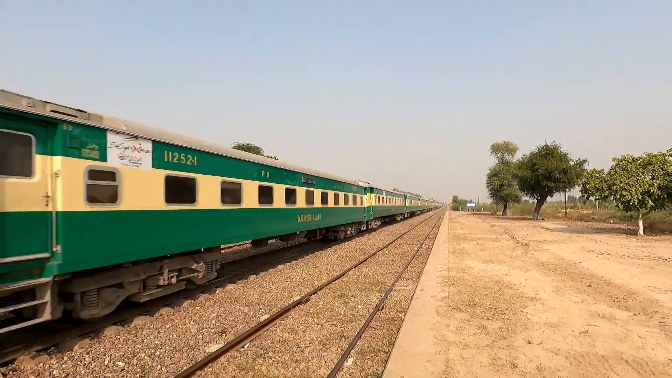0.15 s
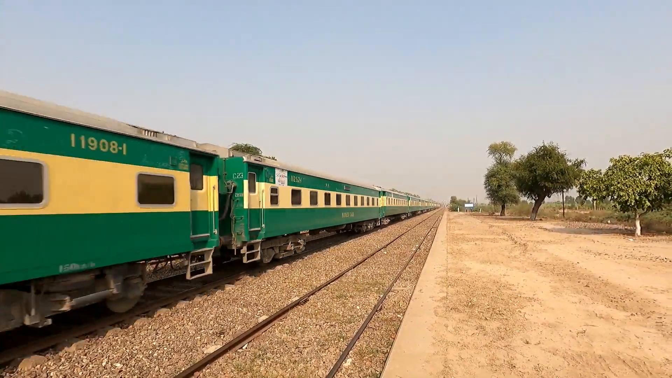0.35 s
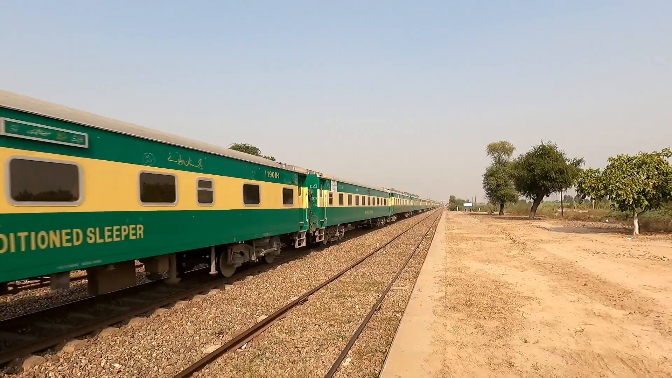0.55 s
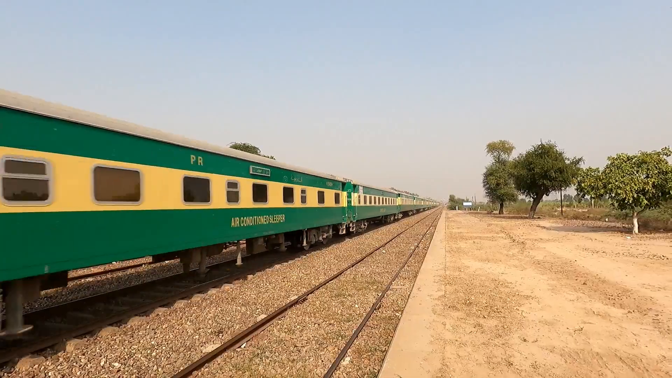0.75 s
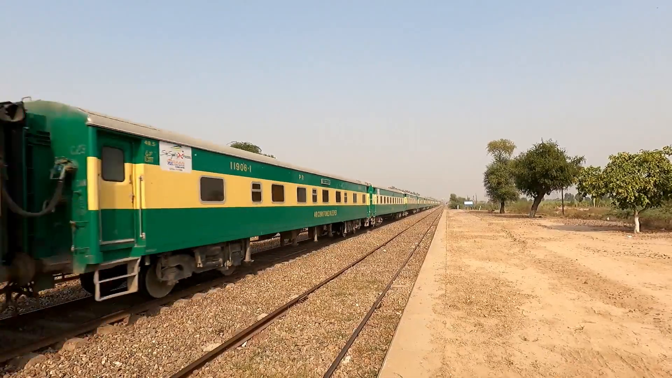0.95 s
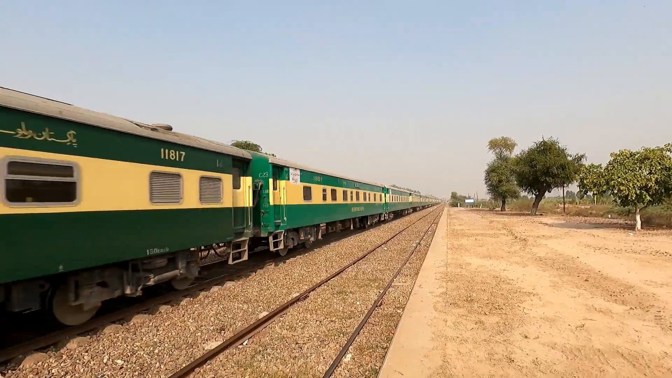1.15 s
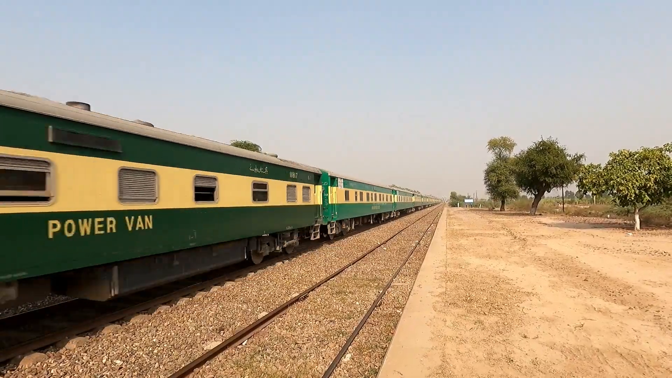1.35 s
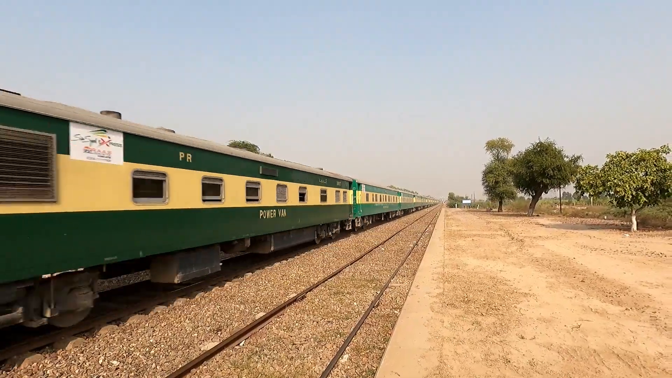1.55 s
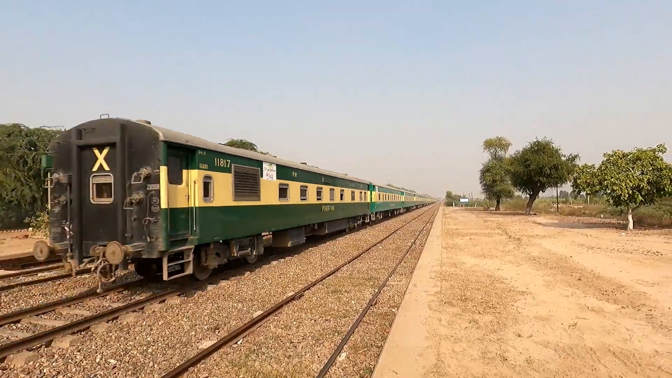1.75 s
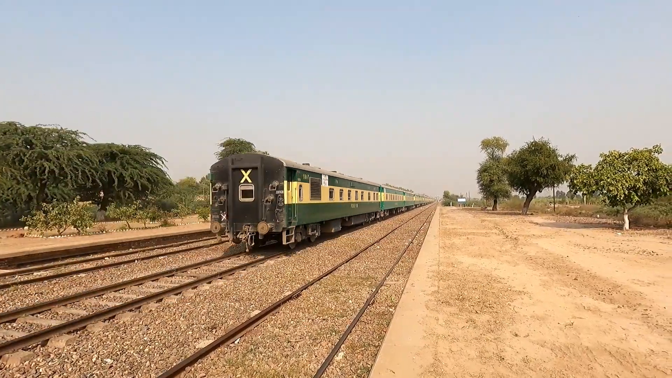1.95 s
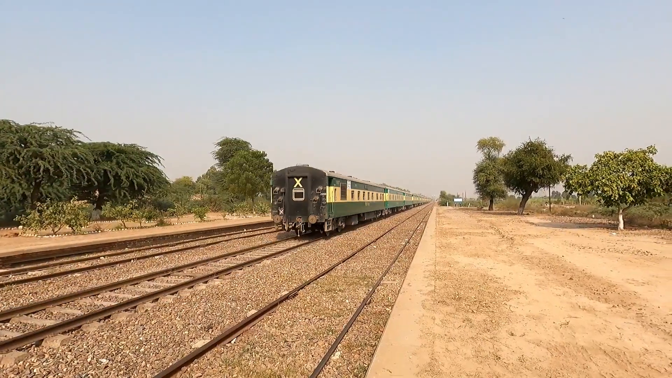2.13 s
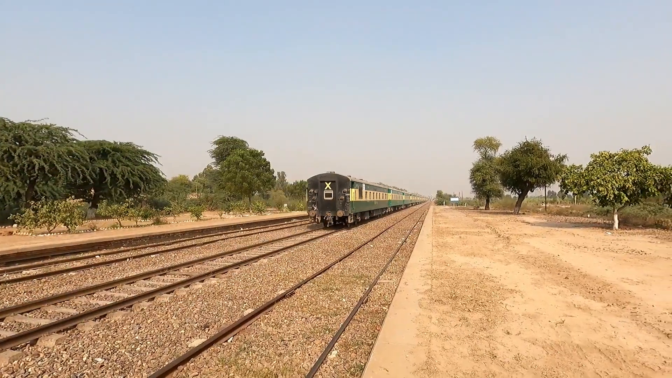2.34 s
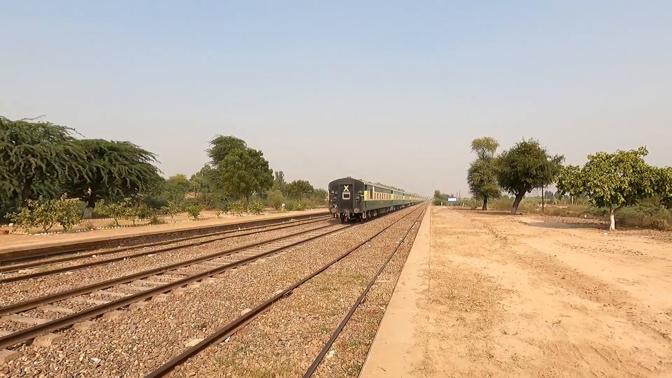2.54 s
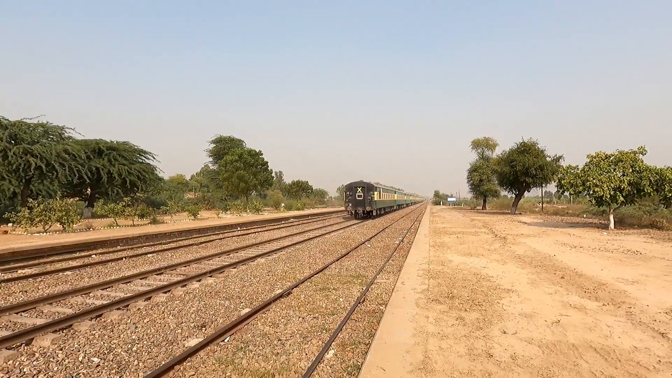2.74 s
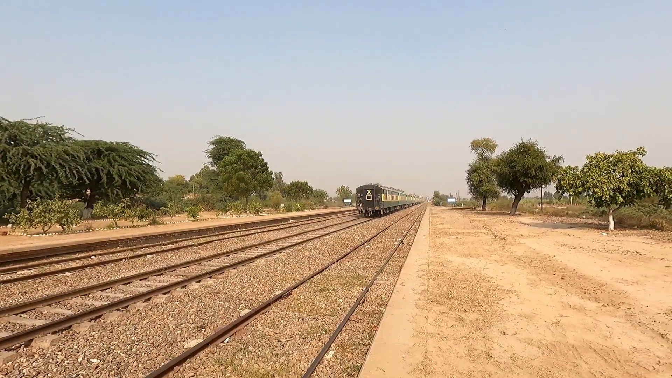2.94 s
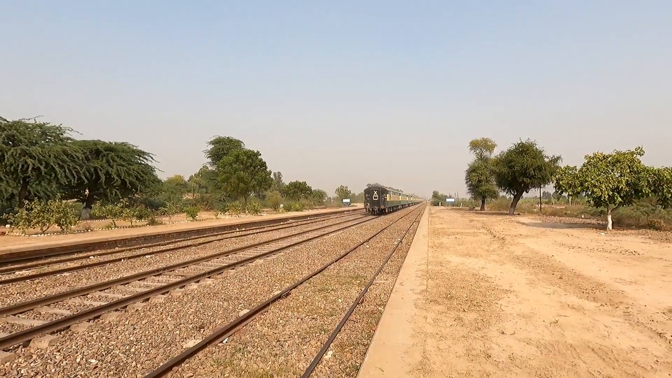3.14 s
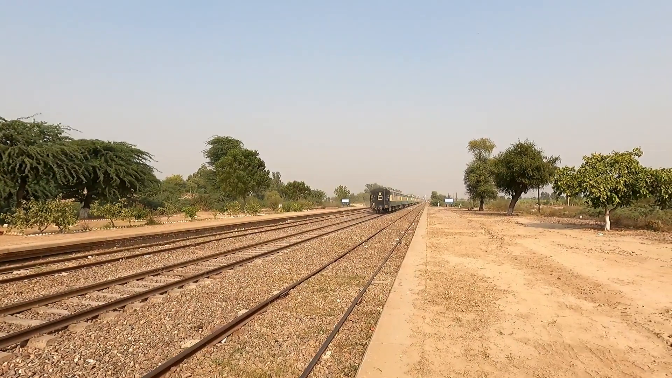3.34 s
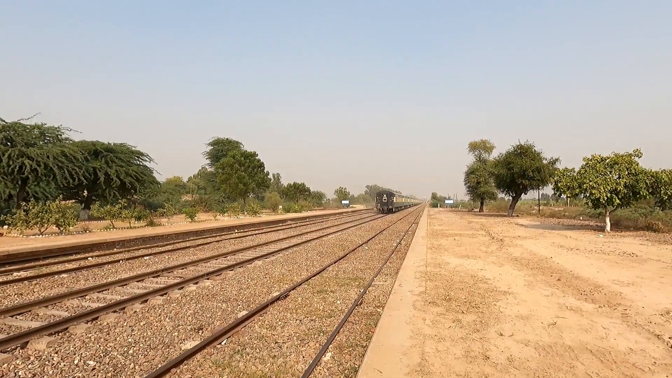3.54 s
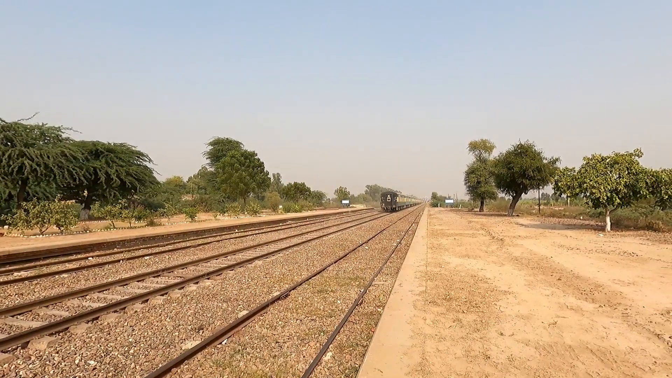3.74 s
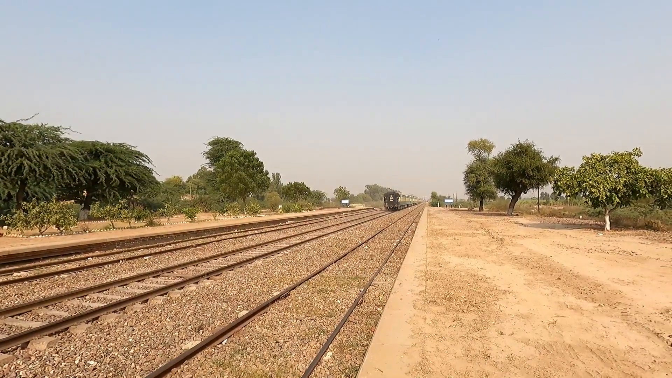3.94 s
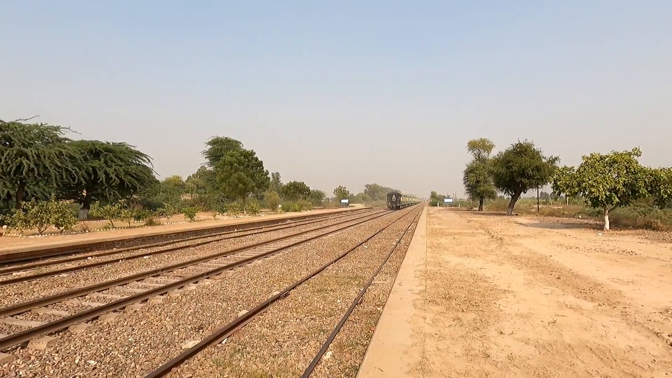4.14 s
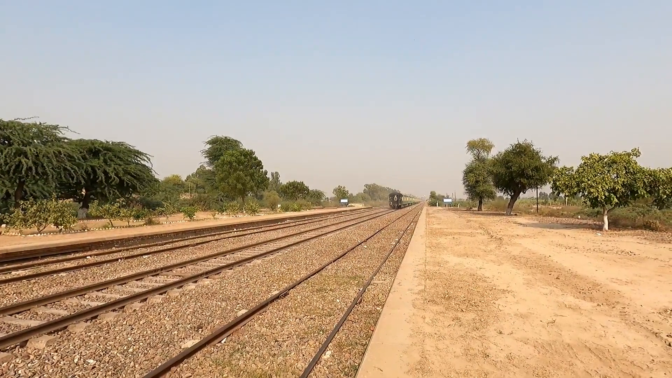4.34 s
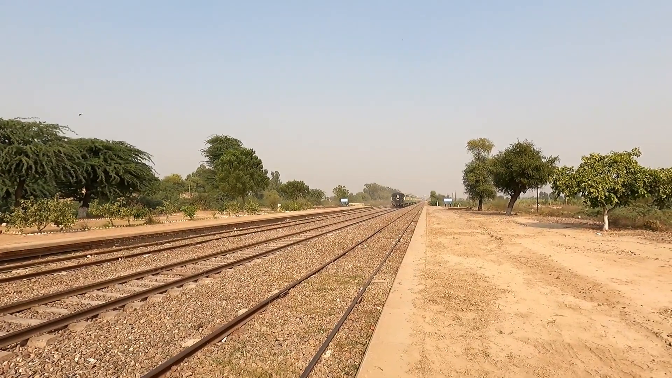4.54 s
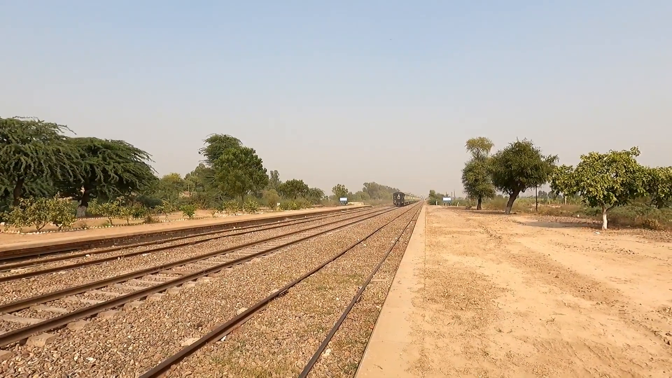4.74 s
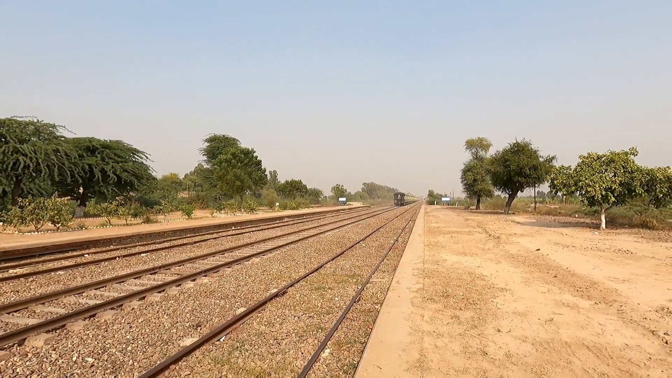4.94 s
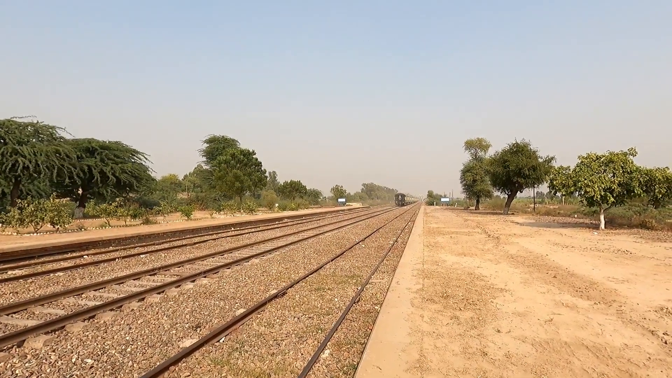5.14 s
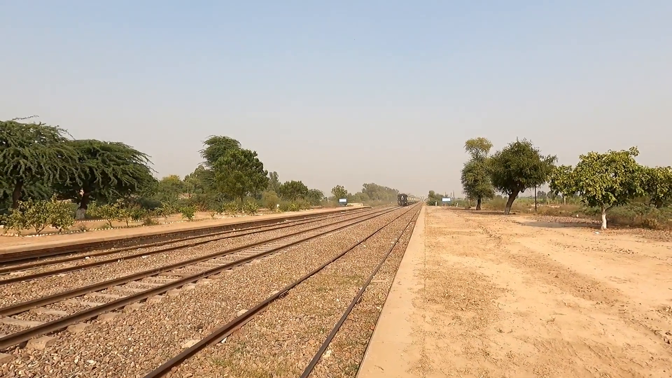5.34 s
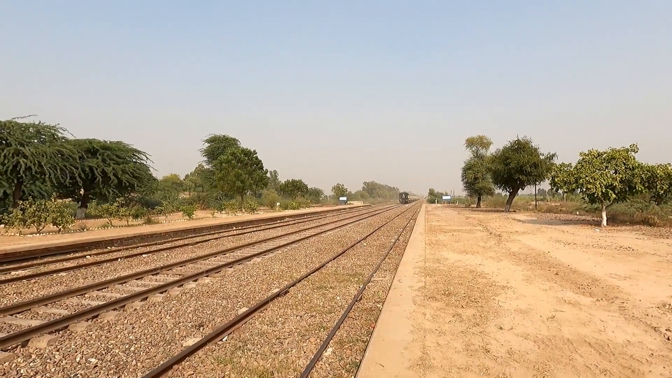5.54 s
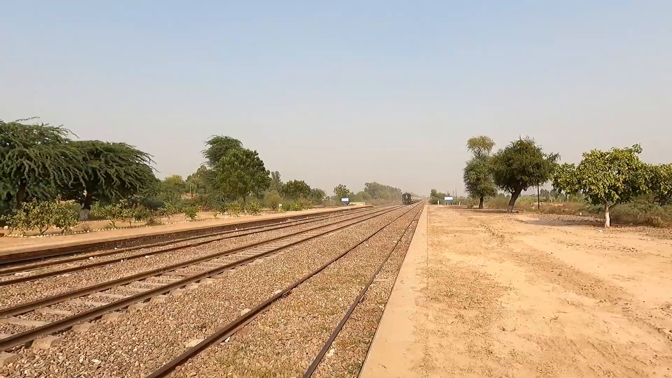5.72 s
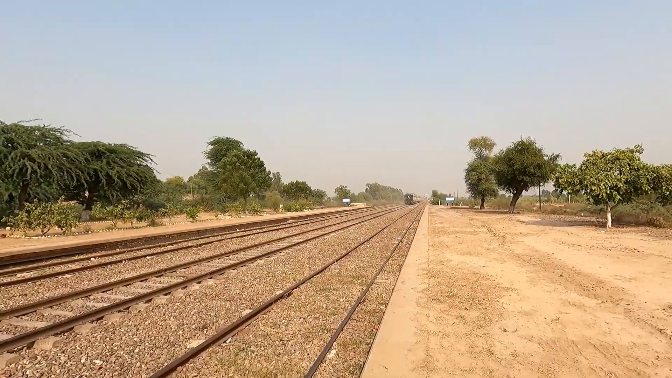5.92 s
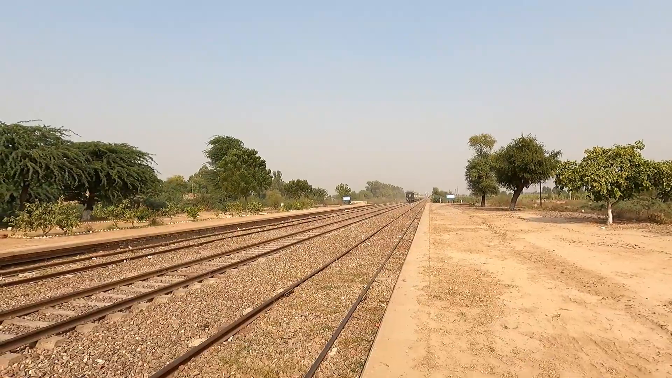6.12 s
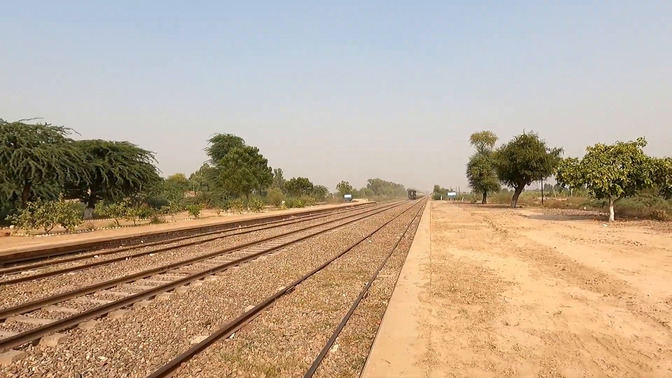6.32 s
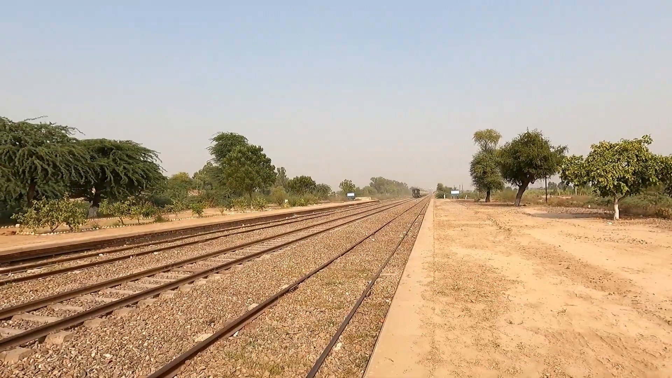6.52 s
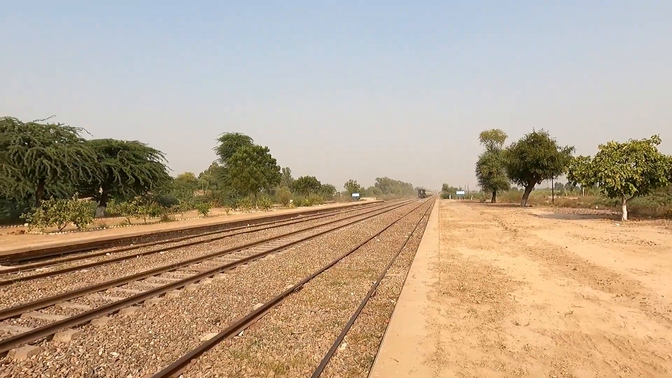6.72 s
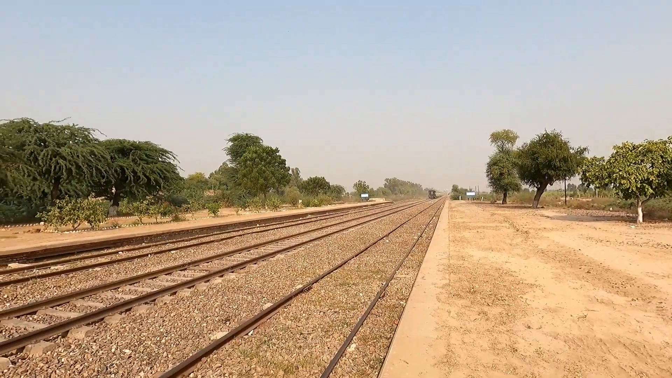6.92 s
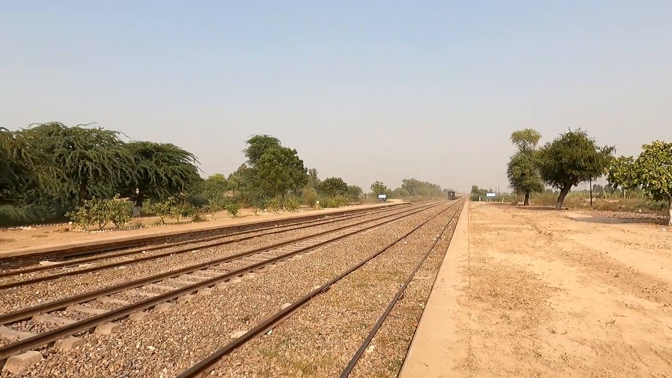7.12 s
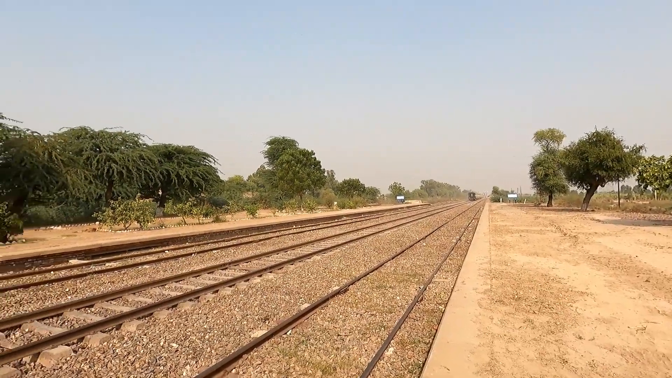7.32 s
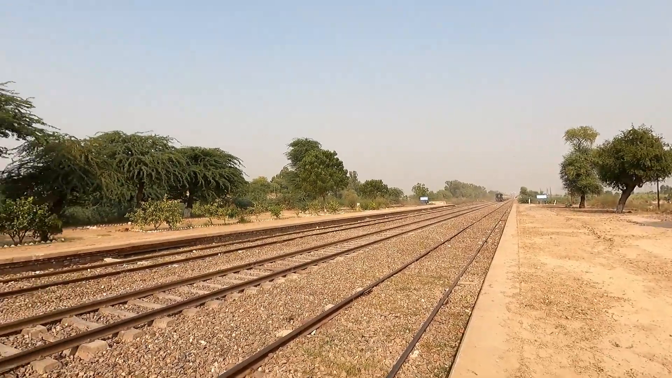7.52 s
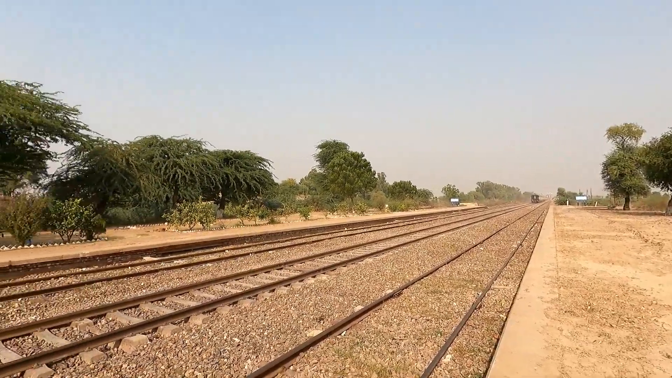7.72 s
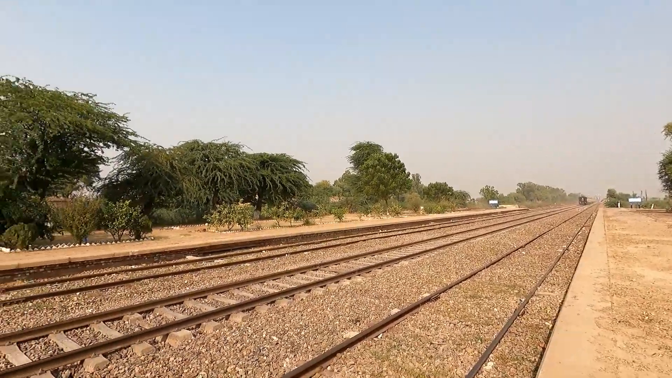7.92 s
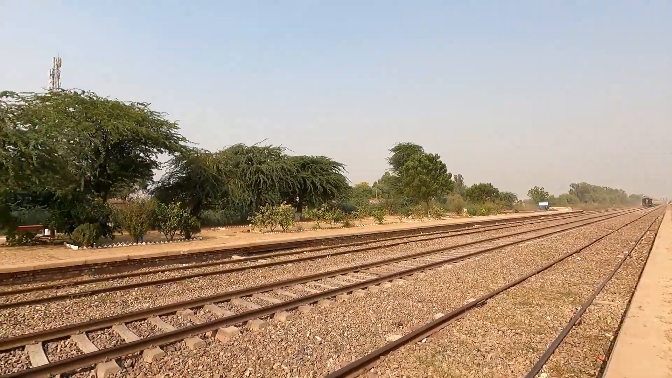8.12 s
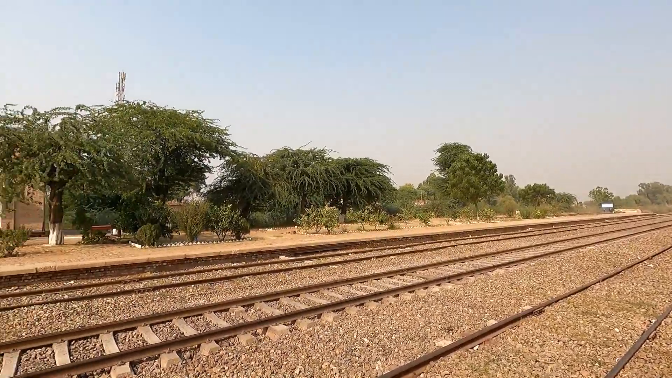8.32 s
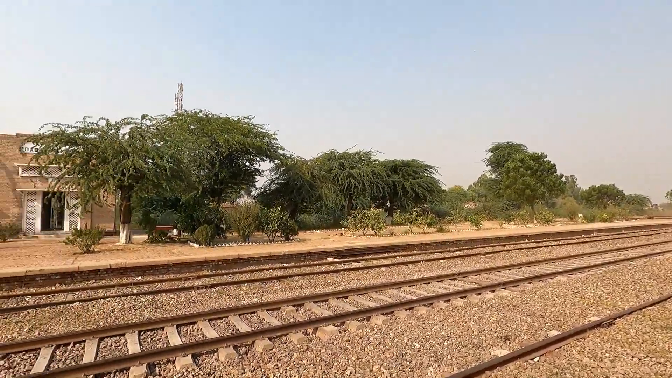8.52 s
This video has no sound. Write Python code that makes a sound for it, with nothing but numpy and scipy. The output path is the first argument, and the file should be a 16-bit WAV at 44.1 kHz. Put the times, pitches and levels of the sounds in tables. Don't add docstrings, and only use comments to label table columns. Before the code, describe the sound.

A loud rush of train wheels with heavy joint thumps recedes into metallic clanking and chattering, fading to faint rumble and a thin chirp

```python
import sys
import numpy as np
from scipy import signal
from scipy.fft import rfft, irfft, next_fast_len
from scipy.io import wavfile
from scipy.ndimage import uniform_filter1d

SR = 44100
rng = np.random.default_rng(int(sys.argv[2]) if len(sys.argv) > 2 else 0)


def ratio_of_db(decibels):
    return 10 ** (np.asarray(decibels, float) / 20)


def waveform_to_disk(signal):
    frames = np.transpose(np.atleast_2d(signal))
    scaled = np.clip(frames, -1, 1) * 32767
    samples = np.round(scaled).astype(np.int16)
    wavfile.write(sys.argv[1], SR, samples)


N = 382347
HOP = 64


def bell(f, hz, width_hz):
    return 1 / np.sqrt(1 + (2 * (f - hz) / width_hz) ** 2)


def walk(rate):
    k = int(SR / HOP / rate)
    held = np.repeat(rng.standard_normal(N // HOP // k + 2), k)
    return 2.6 * uniform_filter1d(uniform_filter1d(held, k), k)[:N // HOP + 1]


def unit(x):
    return x / np.sqrt(np.mean(x ** 2))


def noise_band(order, low_hz, high_hz, noise):
    return signal.sosfilt(signal.butter(order, [low_hz, high_hz], "band", fs=SR, output="sos"), noise)


def blow(length, hz, width_hz, rise):
    t = np.arange(4096) / SR / max(length, .004)
    shocks = rng.standard_normal(len(t)) * (1 - np.exp(-t / rise)) * np.exp(-t ** 2)
    mode = signal.iirpeak(hz, hz / width_hz, fs=SR)
    y = signal.lfilter(*mode, signal.lfilter(*mode, shocks))
    return y / np.abs(y).max()


def add(out, s, x):
    i = int(s * SR)
    out[i:i + len(x)] += x[:len(out) - i]


def db_of(bins, size):
    return 10 * np.log10(2 * np.sum(np.abs(bins) ** 2) / size ** 2)


ALONGSIDE_DB = [-16.5, -16.5, -18.5, -17.5]
LOSS_SHARE = [1.04, 0.85, 0.43, 1.247]
# (time [s], level [dB])
RATTLE = [
    (1.6, -42.5),
    (2.2, -33),
    (2.6, -26.5),
    (3.0, -29),
    (3.7, -20.5),
    (4.0, -21.5),
    (4.43, -20),
    (4.5, -26.5),
    (4.75, -40),
]
RATTLE_PARTS_DB = [-7.5, -3, 2.7, -3]
THUMP_SWELL = [0.56, 0.12, .05, .05]
# (time [s], change [dB])
GRIT = [(0.0, 2.2), (0.15, -1), (0.7, 0.1), (1.15, 1), (1.4, -2.5), (1.7, 2), (2.1, 3), (2.47, 3.5),
        (2.62, 1), (2.9, 3.3), (3.35, 3.5), (4.05, -2), (4.4, 0), (5.05, -0.1), (5.9, 1), (7.0, -1.5),
        (7.8, -0.5), (8.67, -1.5)]
GRIT_SHARE = [0.01, 0.1, .4, 1.01]
COUNTRY_DB = [-32.5, -41, -34.5, -52]


def roll_parts(t):
    last_coach_s, track_m, speed_m_s = 1.276, 20.6, 30.65
    gone_m = speed_m_s * np.maximum(t - last_coach_s, 0)
    loss_db = 10 * np.log10(1 + (gone_m / track_m) ** 2)
    train = np.array(ALONGSIDE_DB)[:, None] - np.outer(LOSS_SHARE, loss_db)
    beat_share, beat_s = 0.24, 0.042
    beat = sum(ratio_of_db(crash_db + 1.5) * np.exp(-((t - s - beat_s / 2) / beat_s * 2) ** 2)
               for s, _, _, crash_db in POINTS_AXLES)
    rattle = ratio_of_db(np.interp(t, *np.transpose(RATTLE), left=-90, right=-90))
    rattle = rattle * (1 - beat_share + 2 * beat_share * beat)
    thud = sum(ratio_of_db(db - 12) * np.exp(-((t - s - length / 2) / length) ** 2) for s, db, _, length in THUMPS)
    near = ratio_of_db(train) * (1 + np.outer(THUMP_SWELL, thud))
    steel = near ** 2 + np.outer(ratio_of_db(np.array(RATTLE_PARTS_DB)), rattle) ** 2
    grit = ratio_of_db(np.outer(GRIT_SHARE, np.interp(t, *np.transpose(GRIT))))
    return 10 * np.log10(steel * grit ** 2 + ratio_of_db(np.array(COUNTRY_DB))[:, None] ** 2)


ROLL_HZ = [220, 620, 1500, 4200]
# (frequency [Hz], level [dB per Hz])
ROLL_COLOUR = [(18, -56), (30, -16.5), (82, -7.5), (119, -8), (209, -3.5), (496, -2), (598, 3.5),
               (1050, -3), (1290, -4.5), (1450, 3), (1750, -5.5), (1920, -3.5), (4360, -20), (6640, -29.5),
               (8010, -37.5), (10400, -53), (17600, -120)]
# (frequency [Hz], width [Hz], lift [dB])
ROLL_PEAKS = [(468, 34, -2.5), (619, 410, -7), (1050, 33, 3.5), (1200, 20, -5), (1450, 86, -6.5),
              (1938, 63, 3.5), (2520, 40, 6), (3164, 61, 5.5), (4050, 350, 3)]
# (frequency [Hz], change [dB])
FAR_CHANGE = [(250, 0), (450, -3.5), (620, 2), (950, -5), (1300, 0.4), (1700, -5), (2500, 4.5), (4000, 6.2),
              (6500, -2.5), (8500, -6)]


def rolling():
    size = next_fast_len(N)
    f = np.fft.rfftfreq(size, 1 / SR) + 1
    hz, db = np.transpose(ROLL_COLOUR)
    colour = ratio_of_db(np.interp(np.log(f), np.log(hz), db, right=-200))
    for mode_hz, width_hz, lift_db in ROLL_PEAKS:
        colour = colour * ratio_of_db(lift_db * bell(f, mode_hz, width_hz) ** 2)
    spectrum = rfft(rng.standard_normal(size)) * colour
    edges = [100, 400, 900, 2500, 7000]
    own = [db_of(spectrum[(f > a) & (f < b)], size) for a, b in zip(edges, edges[1:])]
    t = np.arange(N // HOP + 1) * HOP / SR
    parts = roll_parts(t) - np.array(own)[:, None]
    sway, rattle = walk(5.44), walk(11)
    far = 1 - np.exp(-(t / 4.6) ** 2)
    far_hz, far_db = np.transpose(FAR_CHANGE)
    out = 0
    for step in range(28):
        centre = 20 * 2 ** (step / 3)
        share = np.cos(np.pi / 2 * np.clip(3 * np.log2(f / centre), -1, 1))
        mix = [np.interp(np.log(centre), np.log(ROLL_HZ), only) for only in np.eye(4)]
        level = np.array(mix) @ parts
        calm = np.clip(np.log2(160 / centre) / 1.55, 0, 1)
        level = level + calm * (level.mean() - 1.0 - level)
        change = far * np.interp(np.log(centre), np.log(far_hz), far_db)
        treble = np.clip(np.log2(centre / 700) / 3.5, 0, 1)
        together = treble * (1 - .5 * far) * (0.25 * sway + 0.8 * rattle)
        flicker = together + 0.53 * walk(9)
        gain = ratio_of_db(level + change + flicker)
        out = out + irfft(spectrum * share, size)[:N] * np.interp(np.arange(N) / SR, t, gain)
    return out


# (time [s], peak level [dB], rail ring level [dB], length [s])
THUMPS = [(0.037, 5.5, -5, 0.018), (0.226, 3.5, -23, 0.046), (0.301, 5, -3, 0.05),
          (0.455, -7.5, -15.5, 0.03), (0.597, -0.5, -8.5, 0.034), (0.712, 7.5, -9, 0.035),
          (0.791, 2, -15, 0.035), (0.974, 7, -17, 0.035), (1.055, 7, -6, 0.02), (1.196, 3.5, -9, 0.033),
          (1.371, -4.5, -9, 0.04), (1.46, 10, -13.5, 0.026), (1.543, 9, -11, 0.024), (1.631, 3, -17, 0.012),
          (1.87, 4.5, -9.5, 0.035), (1.947, 4, -2.5, 0.042), (2.289, -8, -12, 0.061),
          (2.375, 0.5, -4.5, 0.032), (2.536, -13, -19, 0.031), (2.636, -7, -9, 0.017),
          (4.528, -8, -28, 0.014)]


def joint():
    out = np.zeros(N)
    for s, db, rail_db, length in THUMPS:
        sleeper_hz = 228.4 * (1 + 0.064 * rng.standard_normal())
        add(out, s - .006, ratio_of_db(db - 6.5) * blow(length, sleeper_hz, 136.0, rise=0.2))
        add(out, s - .006, ratio_of_db(rail_db) * blow(1.64 * length, 520.0, 650.0, rise=.3))
    return out


def clanks(blows, length, usual_db):
    out = np.zeros(N)
    for s, db, hz, crash_db in blows:
        width_hz = np.clip(900 * 2 ** ((crash_db - db) / 11), 200, 1500)
        ring_s = length * ratio_of_db(0.25 * (db - usual_db))
        add(out, s, ratio_of_db(db) * blow(ring_s, hz, width_hz, rise=0.033))
        add(out, s, ratio_of_db(crash_db) * blow(1.35 * length, 3000.0, 3200.0, rise=0.3))
        add(out, s, ratio_of_db(crash_db - 3.5) * blow(length, 740.0, 500., rise=0.2))
    return signal.sosfilt(signal.butter(2, 5500, fs=SR, output="sos"), out)


# (time [s], peak level [dB], ring [Hz], crash level [dB])
GEAR = [
    (0.09, -4.5, 1050, -15),
    (1.1, -20, 1490, -5.5),
    (1.65, -13.5, 1590, -5.5),
    (1.77, -14, 1880, -7.5),
]


def loose_gear():
    return clanks(GEAR, length=0.051, usual_db=-10)


# (time [s], peak level [dB], ring [Hz], crash level [dB])
POINTS_AXLES = [(2.26, -6.5, 1020, -18.5), (2.545, -10, 1330, -5), (2.653, -3.5, 1200, -19),
                (2.737, -5.5, 1140, -16.5), (2.8, -10, 1930, -17), (3.021, -8.5, 1080, -29),
                (3.08, -9, 1440, -8), (3.158, -6.5, 1050, -12.5), (3.236, -10, 1340, -11.5),
                (3.397, -9, 1040, -15), (3.465, -8.5, 1050, -10.5), (3.565, -9.5, 1450, -9.5),
                (3.658, -11.5, 1450, -9), (3.762, -4, 1050, -23), (3.829, -7, 2030, -9),
                (3.91, -7.5, 1800, -9), (4.069, -8, 1160, -21), (4.158, -2.5, 1130, -20),
                (4.206, -11, 1900, -28), (4.236, -1, 1114, -20.5), (4.306, -4, 990, -10),
                (4.39, -9.5, 1340, -7)]
# (time [s], peak level [dB], ring [Hz], crash level [dB])
FAR_POINTS_AXLES = [(4.524, -19, 1380, -19), (4.617, -15, 1290, -19), (4.688, -15.5, 1330, -31),
                    (4.745, -13.5, 1320, -33), (4.859, -14, 1250, -24), (5.364, -16.5, 1200, -18.5),
                    (5.47, -29, 1900, -19.5), (5.665, -15, 1180, -37), (5.746, -18, 1200, -41),
                    (5.821, -14.5, 1200, -34), (6.21, -29, 1100, -35)]


def points():
    return clanks(POINTS_AXLES, 0.042, usual_db=-6) + clanks(FAR_POINTS_AXLES, 0.042, usual_db=-12)


CHATTER_HZ = [1050, 1200, 1450, 1890, 1880, 1800, 2465]


def chatter(count=150):
    out = np.zeros(N)
    for when, which, size in rng.random((count, 3)):
        at = 1.9 + 4.4 * when
        hz = CHATTER_HZ[int(which * len(CHATTER_HZ))]
        wheel_db = roll_parts(np.array([at]))[2, 0]
        db = wheel_db + .7 + 5 * size - 2.5 * (at > 4.5) - 4 * np.log2(hz / 1050)
        add(out, at, ratio_of_db(db) * blow(0.035, hz, 130., rise=0.23))
    return out


# (time [s], peak level [dB], frequency
# [Hz])
KNOCKS = [
    (2.332, -1, 900),
    (2.375, -3, 900),
    (2.748, 0.5, 1600),
    (3.167, 1.5, 1600),
    (3.665, 3, 1800),
    (4.405, -1.5, 1600),
    (4.413, -.7, 1600),
    (4.777, -3, 1300),
]


def hard_knocks():
    out = np.zeros(N)
    for s, db, hz in KNOCKS:
        turns = np.arange(-1.5 * SR / hz, 1.5 * SR / hz) * hz / SR
        add(out, s - 1.5 / hz, ratio_of_db(db) * np.hanning(len(turns)) * np.cos(2 * np.pi * turns))
    return out


# (time [s], pitch [Hz], level [dB])
BIRD = [
    [(6.858, 3300, -35), (6.9, 3270, -32), (6.914, 3300, -35)],
    [(6.926, 3400, -35), (6.94, 3120, -32.5), (6.96, 2550, -35)],
    [(7.74, 5300, -56), (7.81, 5450, -52)],
    [(8.635, 3300, -40), (8.69, 3300, -33)],
]


def bird():
    out = np.zeros(N)
    for whistle in BIRD:
        s, hz, db = np.transpose(whistle)
        t = np.arange(s[0], s[-1], 1 / SR)
        phase = 2 * np.pi * np.cumsum(np.interp(t, s, hz)) / SR
        swell = np.sqrt(2) * ratio_of_db(np.interp(t, s, db)) * signal.windows.tukey(len(t), .3)
        add(out, s[0], swell * (np.sin(phase) + ratio_of_db(-24) * np.sin(2 * phase)))
    return out


def scene():
    sound = rolling() + joint() + loose_gear() + points() + chatter() + hard_knocks() + bird()
    port_lag_s = 21e-6
    size = next_fast_len(N)
    f = np.fft.rfftfreq(size, 1 / SR)
    turn = np.exp(-1j * np.pi * f * port_lag_s)
    ports = np.array([irfft(rfft(sound, size) * lag, size)[:N] for lag in (turn, turn.conj())])
    loud = np.sqrt(uniform_filter1d(sound ** 2, 1500))
    scatter = unit(noise_band(2, 1500, 5000, rng.standard_normal(N)))
    breeze = unit(noise_band(2, 25, 90, rng.standard_normal(N)))
    difference = ratio_of_db(-31.5) * loud * scatter + ratio_of_db(-77.5) * breeze
    return ports + difference * np.array([[1], [-1]])


def top_cut(x):
    return signal.sosfilt(signal.butter(12, 15700, fs=SR, output="sos"), x)


def record(dry):
    housing = signal.sosfilt(signal.butter(8, 7600, fs=SR, output="sos"), dry)
    treble = signal.sosfilt(signal.butter(3, 4200, "high", fs=SR, output="sos"), dry)
    drive = ratio_of_db(-14.5) * np.abs(uniform_filter1d(treble ** 2, 300)) ** 0.83
    air = rng.standard_normal((3, N))
    centre_hz, width_hz = 10850, 2040
    ring = noise_band(3, centre_hz - width_hz / 2, centre_hz + width_hz / 2, air[0] + 0.28 * air[1:])
    capsule = drive * ring * 3
    floor_hz = 12100
    own_hiss = noise_band(4, floor_hz - 800, floor_hz + 1000, air[0][::-1] + air[1:])
    capsule = capsule + ratio_of_db(-71) * own_hiss
    return top_cut(np.clip(housing + capsule, -.99, .99))


dry = scene()
out = record(dry)
waveform_to_disk(out)
```